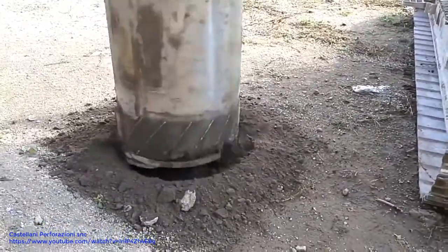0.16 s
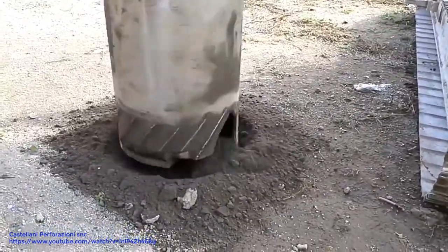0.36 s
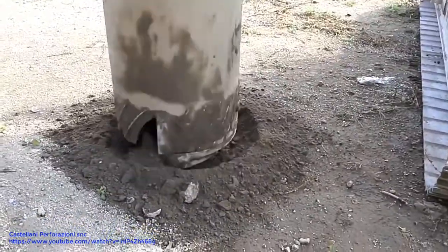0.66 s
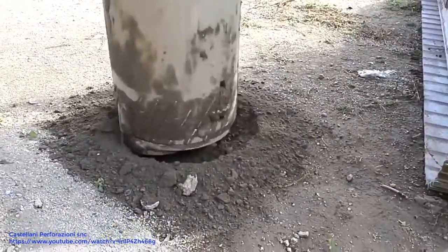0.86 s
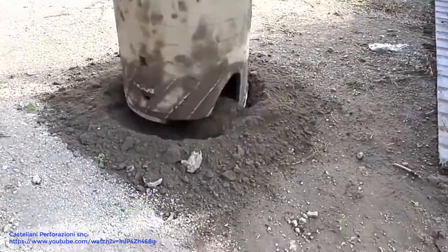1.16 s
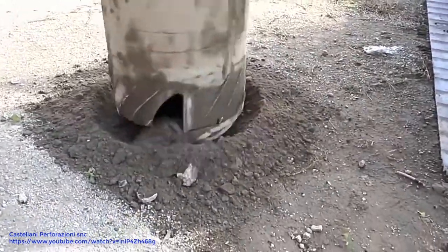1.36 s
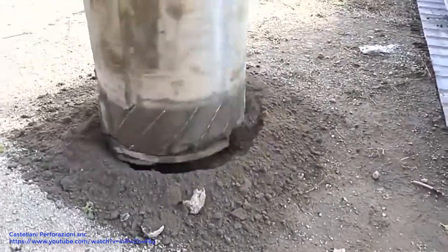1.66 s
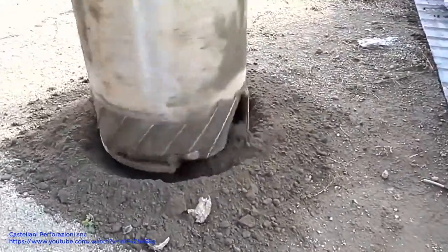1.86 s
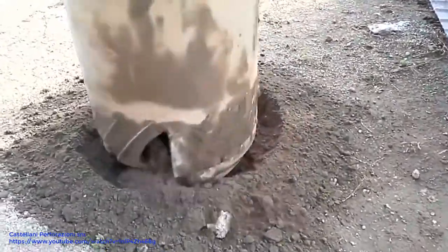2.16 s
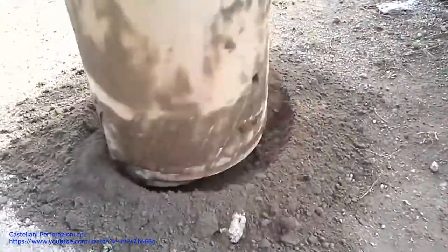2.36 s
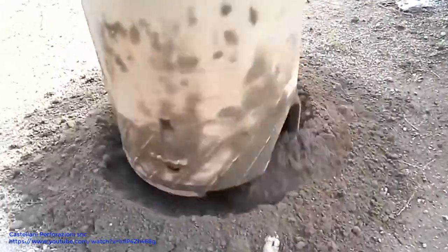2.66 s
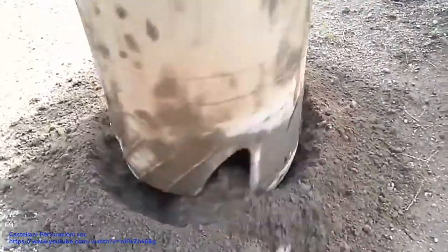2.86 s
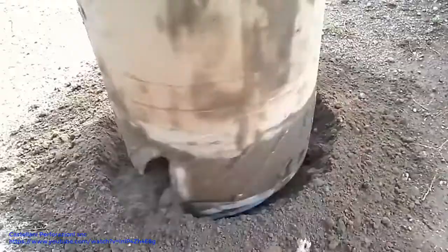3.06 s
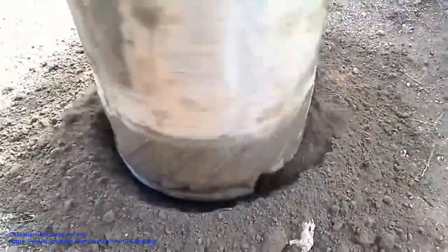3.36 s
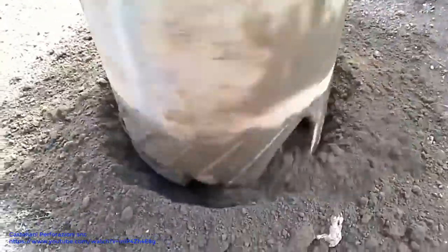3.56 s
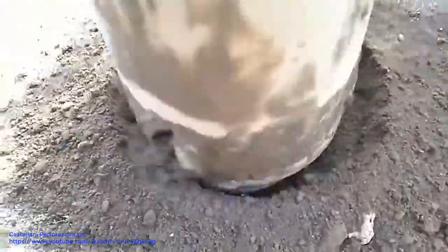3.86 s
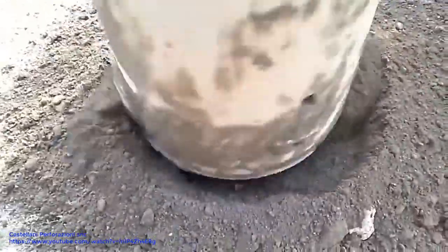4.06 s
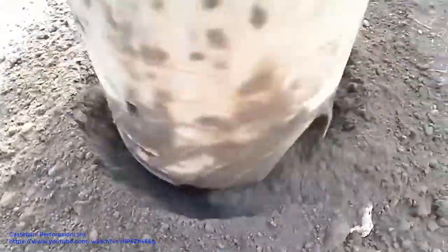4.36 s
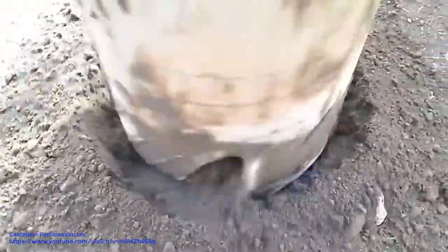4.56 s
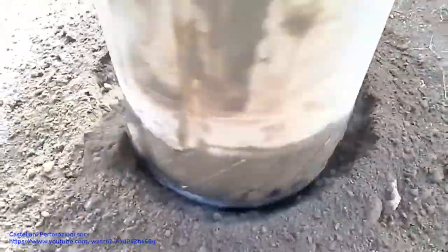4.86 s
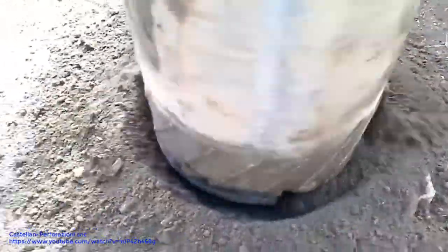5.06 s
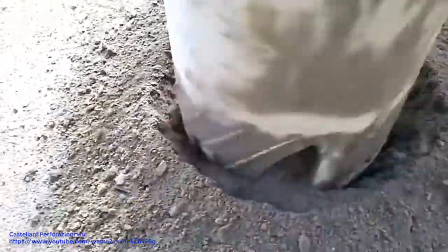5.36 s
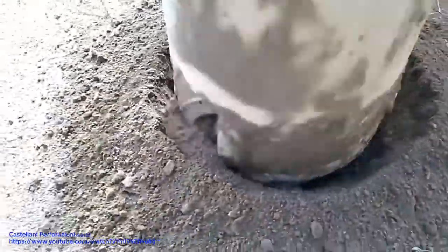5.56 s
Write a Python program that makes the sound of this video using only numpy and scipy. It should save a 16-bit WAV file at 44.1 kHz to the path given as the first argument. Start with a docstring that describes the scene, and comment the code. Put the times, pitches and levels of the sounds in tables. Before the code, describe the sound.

A diesel drilling rig roars steadily while its whining hydraulic drive turns a steel tube into soil, with repeated metal clanks and sharp clicks.

```python
"""Diesel drilling rig, close to the hole

Outdoors, the microphone is carried up to the hole where the rig turns a steel tube into soil.
The engine holds its speed: sines at multiples of one firing rate, with its piston pump. The hydraulic
rotary motor and gears are sines on one pitch that sags and recovers with the load. Over a broad roar of
filtered noise, steel clanks and tube knocks are noise in resonances, dry broadband clicks are single
pulses, and thin high rings are one damped sine at 10.4 kHz, breaking up, at or near some blows."""
import sys
import numpy as np
from scipy import signal
from scipy.io import wavfile
from scipy.ndimage import uniform_filter1d, minimum_filter1d

SR = 44100
rng = np.random.default_rng(int(sys.argv[2]) if len(sys.argv) > 2 else 0)


def wrap_up_sound(samples):
    """Save the sound to the file named by the first command line argument, as 16-bit audio."""
    columns = np.atleast_2d(samples).T
    # keep every value between -1 and 1, then stretch to whole-number steps
    tamed = np.clip(columns, -1, 1)
    steps = np.round(tamed * 32767).astype(np.int16)
    wavfile.write(sys.argv[1], SR, steps)


N = 252363

FIRING_HZ = 102.09
# A second rotor turns this far under the firing rate; time of a beat top; level re the firing line
BEAT_HZ, BEAT_TOP_S, SECOND_ROTOR_DB = 4.95, .15, -5
# Walking up to the hole puts the rig's body between engine and microphone: one smooth level step per line.
# Firing line: level at first/dB, loss/dB, t halfway/s, t spread/s
FIRING_SHADE = (-29.5, 9.5, 2.5, 0.15)
# Upper pump lines: multiple of firing rate, level at first/dB, loss/dB (negative: gain), t halfway/s, t spread/s
PUMP_LINES = [(6.0, -28.5, -1, 4, 0.23), (9.0, -20.5, 13.5, 2.02, 0.22), (24.0, -29, 8.5, 1.35, 0.22)]
# First pump line: t/s, level/dB
PUMP_HUM = [(0, -17), (1.4, -15), (2.2, -18), (2.64, -14), (3.15, -15.5), (3.96, -27.5), (4.4, -21),
            (4.84, -27.5), (5.28, -19), (5.72, -33)]
# Steady weaker engine lines: multiples of the firing rate (thirds are crankshaft orders)
ENGINE_ORDERS = [5 / 3, 2, 4, 13 / 3, 14 / 3, 5, 20 / 3, 7, 12, 14, 18, 21, 33]
# Their levels in the same order: level/dB
ENGINE_ORDERS_DB = [-37, -33, -30.5, -29.5, -27.5, -32, -32.5, -34.5, -34.5, -41, -38.5, -38.5, -44.5]

# Rotary motor: t/s, piston rate f/Hz, level/dB of its multiples 1, 2, 4, 5
ROTARY = [(0, 355.2, -34, -25.5, -40, -37.5), (.22, 359.2, -19, -25, -35, -41),
          (.44, 361, -19.5, -25.5, -27, -33), (.57, 362.2, -21, -37, -39, -45),
          (.83, 359.5, -16.5, -24.5, -22, -31), (1.03, 353.3, -16.5, -27, -39, -25.5),
          (1.3, 363, -24.5, -25, -33.5, -41), (1.45, 351.5, -31, -27, -39, -32),
          (1.6, 354.5, -16, -41, -36, -25.5), (1.8, 364, -14, -21, -38, -34),
          (2.03, 354, -11.5, -27, -22.5, -26.5), (2.24, 357.1, -10.5, -26.5, -29, -34),
          (2.45, 361, -14, -35, -35, -27.5), (2.64, 357.5, -14.5, -32, -26.5, -27.5),
          (2.78, 360.7, -14, -25.5, -41, -38.5), (3.08, 343.8, -11, -21.5, -24, -21),
          (3.32, 358.5, -11, -25, -29.5, -37), (3.6, 355, -12.5, -20.5, -26, -27),
          (3.76, 356.5, -12, -18, -36, -27.5), (3.93, 358, -11.5, -38, -25, -28),
          (4.09, 350.3, -14, -28, -38, -36), (4.3, 354.9, -15, -21, -33, -24.5),
          (4.55, 352.6, -18, -24.5, -26, -24), (4.73, 362.3, -18.5, -23, -26, -19.5),
          (4.94, 357.7, -29, -26, -20.5, -23.5), (5.18, 355.9, -19.5, -20.5, -37, -29.5),
          (5.33, 354.5, -21, -21, -27.5, -18.5), (5.5, 344.7, -16, -23.5, -27, -32),
          (5.72, 344, -12, -29, -29, -26)]
# Weaker motor multiples: multiple, level halfway through/dB, change as the microphone nears the drive/(dB/s)
WHINE = [(3.0, -33, .1), (6.0, -37, -1.5), (8.0, -46, 4.5)]
FADE_DB, FADE_RATE_HZ = 3, 2.5  # these come and go by chance as paths interfere
GEAR_RATIO = 2.085  # tooth mesh rate over piston rate
# Gear whine, growing overall as the tube bites: t/s, level of mesh multiple 2/dB, of mesh multiple 4/dB
GEARS = [(0, -48, -51), (1.7, -38, -51), (2.45, -30, -39.5), (2.86, -32, -49), (3.08, -33, -24),
         (3.35, -25, -45), (3.74, -39, -37.5), (4.18, -24, -27.5), (4.4, -26, -29.5), (4.62, -35, -26.5),
         (4.84, -33, -33), (5.1, -27.5, -30), (5.3, -29, -25), (5.5, -25, -24.5), (5.72, -39, -26)]
# Further mesh lines: multiple, level re multiple 4/dB
MESH_DB = [(1, -3), (3, -6), (5, -9), (6, -12)]

# Roar spectrum, relative density: f/Hz, level per Hz/dB
ROAR_SPECTRUM = [(30, -48.5), (86, -23), (170, -13.5), (300, -1.5), (480, -8), (590, -10), (707, -8),
                 (900, -12), (1460, -15), (1940, -21), (3740, -19), (4700, -28), (5900, -41), (8500, -24.5)]
# Level step of the roar's low, middle, high, top range: loss/dB (negative: gain), t halfway/s, t spread/s
ROAR_SHADE = [(-1.0, 4.4, .4), (2, 1.8, .3), (0.5, 1.7, .3), (6.5, 2.46, 0.27)]
ROAR_SWAY_DB, ROAR_SWAY_RATE_HZ = 1.5, 1.3

# Steel on steel in the drive: t/s, drive level/dB, t60/s, drive level of the bright edge/dB
CLANKS = [(.009, -2, 0.23, -57), (.183, -4, 0.16, -92), (.317, -8, .18, -57), (.439, -8.5, .2, -90),
          (.925, -7, 0.22, -90), (1.526, -3, 0.14, -62), (1.537, -7.5, 0.16, -26), (1.552, -9.5, 0.19, -35),
          (1.969, -14, .15, -36), (2.0, -13, .2, -43), (2.619, -2, .11, -78), (2.896, -14, .22, -87),
          (3.034, -6.5, .2, -53), (3.192, -8, .18, -80), (3.466, -2, .17, -27), (4.032, -8.5, .18, -47),
          (4.14, -14, 0.22, -45), (4.57, -11.5, .2, -85), (4.668, -13, .23, -71), (4.782, -19, .2, -61),
          (4.93, -6, 0.18, -85), (5.37, -7, .2, -36), (5.393, -23, .12, -32), (5.513, 0, 0.19, -34)]
# Broad resonances of the steel: f/Hz, width/Hz, level/dB
STEEL = [(2040, 220, -3.5), (2560, 430, 1.5), (3080, 110, 1), (3220, 280, 0), (3960, 560, 3.5),
         (5000, 1380, -5.5), (6060, 1500, -11.5), (7420, 1800, -21)]
RISE_S_AT_210MS = 0.0057  # rise time constant of a blow with t60 0.21 s; goes with the square of t60
EDGE_T60_S = .07

# Thin high rings at or near some blows: t/s, level before breaking up/dB
PINGS = [(.01, -42), (1.556, -53), (3.49, -46), (4.03, -46), (4.94, -50), (5.41, -55), (5.52, -51)]
PING_HZ, PING_T60_S = 10400, .3

# Dull knocks of the tube wall: t/s, drive level/dB
KNOCKS = [(.08, -8.5), (.623, -5), (1.439, -8.5), (2.99, -15), (3.849, -9.5), (4.169, -6), (5.096, -6.5),
          (5.508, -3)]
# Modes of the tube: f/Hz, level/dB, t60/s
TUBE = [(300.4, -1.5, 0.3), (501, 4.5, 0.11), (606, -1, 0.084), (710, -1, 0.14), (930, -13, 0.04),
        (1118, -2.5, .07), (1330, -12.5, 0.044)]

# Dry broadband clicks: t/s, peak level/dB
TICKS = [(.3275, -26), (.6815, -29), (1.5445, -14), (1.5535, -18), (1.9755, -26), (2.7824, -31),
         (3.0436, -24), (3.1034, -37), (3.2496, -31), (3.4172, -4), (3.9939, -36), (4.3974, -32),
         (4.7926, -28), (5.3693, -27), (5.3937, -9), (5.5143, -21)]

CEILING = 1.0  # limiter, full scale
CUTOFF_HZ = 15800  # stopband edge of the final low-pass


def amp(db):
    """Level in dB to linear gain."""
    return 10 ** (np.asarray(db) / 20)


def in_time(rows):
    """Each level or pitch column of a table as a curve over all samples."""
    s, *columns = np.transpose(rows)
    return [np.interp(np.arange(N) / SR, s, column) for column in columns]


def drift(rate_hz):
    """Slow chance of spread 1: noise at SR / 40 through two equal poles at rate_hz."""
    r = np.exp(-2 * np.pi * rate_hz * 40 / SR)
    noise = rng.standard_normal(N // 40 + 2002)
    slow = signal.lfilter([1], [1, -2 * r, r * r], noise)[2000:]  # settled part
    return np.interp(np.arange(N) / 40, np.arange(len(slow)), slow / slow.std())


def sink(lost_db, halfway_s, spread_s):
    """A smooth step down in dB; a negative loss steps up."""
    t = np.arange(N) / SR
    return -lost_db * (1 + np.tanh((t - halfway_s) / (2 * max(spread_s, .02)))) / 2


def partial(turns, db, waver_db, wobble_rad):
    """A sine of rms level db before its level and phase waver, as over a shaking path."""
    phase = 2 * np.pi * (turns + rng.random()) + wobble_rad * drift(9.7)
    return np.sqrt(2) * amp(db + waver_db * drift(12.3)) * np.sin(phase)


def resonate(x, hz, width_hz):
    """Two-pole resonance with gain 1 on top."""
    r = np.exp(-np.pi * width_hz / SR)
    b = np.array([1, 0, -1]) * (1 - r * r) / 2
    a = [1, -2 * r * np.cos(2 * np.pi * hz / SR), r * r]
    return signal.lfilter(b, a, x + 1e-18)


def ring(drive, hz, t60):
    """Damped mode: a unit click sets a sine of height 1 ringing."""
    r, w = amp(-60 / (t60 * SR)), 2 * np.pi * hz / SR
    return signal.lfilter([0, np.sin(w)], [1, -2 * r * np.cos(w), r * r], drive + 1e-18)


def clicks(rows):
    """One impulse per event."""
    out, rows = np.zeros(N), np.array(rows)
    out[(rows[:, 0] * SR).astype(int)] = amp(rows[:, 1])
    return out


def engine():
    """Firing line beating with a second rotor, pump multiples and weaker orders, all at fixed pitch."""
    t = np.arange(N) / SR
    turns = FIRING_HZ * t
    second_turns = turns - BEAT_HZ * (t - BEAT_TOP_S)
    first_db, *shade = FIRING_SHADE
    rotors = np.cos(2 * np.pi * turns) + amp(SECOND_ROTOR_DB) * np.cos(2 * np.pi * second_turns)
    out = np.sqrt(2) * amp(first_db + sink(*shade)) * rotors
    out += partial(3 * turns, in_time(PUMP_HUM)[0], .6, .2)
    for order, db, *shade in PUMP_LINES:
        out += partial(round(order) * turns, db + sink(*shade) + 2.0 * drift(1.0), 0.34, 0.14)
    for order, db in zip(ENGINE_ORDERS, ENGINE_ORDERS_DB):
        out += partial(order * turns, db, 2.63, 0.48)
    return out


def rotary():
    """Motor multiples and gear mesh share one shaft, so all glide together; the mesh is rougher and flutters."""
    hz, *motor_db = in_time(ROTARY)
    turns = np.cumsum(hz) / SR
    since_middle = (np.arange(N) - N / 2) / SR
    out = np.zeros(N)
    for k, db in zip([1, 2, 4, 5], motor_db):
        out += partial(k * turns, db, 1.5, 0.09 * k)
    for k, db, db_per_s in WHINE:
        line_db = db + db_per_s * since_middle + FADE_DB * drift(FADE_RATE_HZ)
        out += partial(round(k) * turns, line_db, 0.83, 0.11 * round(k))
    second_db, fourth_db = in_time(GEARS)
    mesh = [(2, second_db), (4, fourth_db)] + [(k, fourth_db + db) for k, db in MESH_DB]
    for k, db in mesh:
        out += partial(k * GEAR_RATIO * turns, db + 2 * drift(45), 1, .6 * k)
    return out


def roar():
    """Third-octave noise bands flicker, most at the top; low ones lope, upper ones rattle and pulse with firing."""
    slow_db = [sink(*shade) + ROAR_SWAY_DB * drift(ROAR_SWAY_RATE_HZ) for shade in ROAR_SHADE]
    knots, levels = np.transpose(ROAR_SPECTRUM)
    white = rng.standard_normal((2, N))  # taken in turn, so neighbouring bands differ
    turns = FIRING_HZ * np.arange(N) / SR
    pulse = np.cos(2 * np.pi * turns)
    lope = np.cos(2 * np.pi * turns / 3)  # unequal cylinders repeat once a crank turn
    rattle_db = 0.27 * drift(3.9) + 0.7 * drift(25) + .5 * pulse
    edges = 28 * 2 ** (np.arange(26) / 3)
    out = np.zeros(N)
    for k, (low, high) in enumerate(zip(edges, edges[1:])):
        place = np.log(low * high) / 2  # log of the band's centre
        band_filter = signal.butter(3, [low, high], "band", fs=SR, output="sos")
        band = signal.sosfilt(band_filter, white[k % 2])
        # how far the band belongs to the low, middle, high and top range
        shares = [np.interp(place, np.log([200, 750, 3800, 7800]), row) for row in np.eye(4)]
        db = np.dot(shares, slow_db) + 1.44 * drift(11.7) + 1.8 * shares[3] * drift(30)
        db += (shares[2] + shares[3]) * rattle_db + 1.1 * shares[0] * lope
        out += band * amp(np.interp(place, np.log(knots), levels) + db)
    out = signal.sosfilt(signal.cheby2(5, 45, 9900, fs=SR, output="sos"), out)
    return amp(-15.0) * out / out.std()  # overall rms -15 dB


def clanks():
    """Each blow is an uneven rattle dying in the steel's broad resonances, with a short bright edge."""
    t, body, edge = np.arange(N) / SR, np.zeros(N), np.zeros(N)
    for s, db, t60, edge_db in CLANKS:
        age = np.maximum(t - s, 0)
        rise = 1 - np.exp(-age / (RISE_S_AT_210MS * (t60 / 0.21) ** 2))
        body += rise * amp(db - 60 * age / t60)
        edge += rise * amp(edge_db - 60 * age / EDGE_T60_S)
    # contacts come uneven and in clumps
    contacts = amp(3 * np.minimum(rng.exponential(1, N), 4) + 1.2 * drift(150))
    noise = rng.standard_normal((2, N)) * contacts / np.sqrt(np.mean(contacts ** 2))
    steel = np.zeros(N)
    for k, (hz, width, db) in enumerate(STEEL):
        steel += (-1) ** k * amp(db) * resonate(body * noise[0], hz, width)  # signs alternate
    steel = signal.sosfilt(signal.cheby2(8, 45, 9600, fs=SR, output="sos"), steel)
    edge_filter = signal.butter(3, [8000, 15400], "band", fs=SR, output="sos")
    return steel + signal.sosfilt(edge_filter, edge * noise[1])


def pings():
    """Thin high rings, each a damped sine that breaks up as it dies."""
    breakup = np.clip(1.2 + drift(30), 0, 1.5)
    return ring(clicks(PINGS), PING_HZ, PING_T60_S) * breakup


def knocks():
    """Each knock is a soft push of about 10 ms, new noise every time, into the modes of the tube."""
    swell = signal.lfilter(np.hanning(500) / np.sqrt(500), [1], clicks(KNOCKS))
    push = swell * rng.standard_normal(N)
    tube = sum(amp(db) * ring(push, hz, t60) for hz, db, t60 in TUBE)
    return signal.sosfilt(signal.butter(2, [150, 1800], "band", fs=SR, output="sos"), tube)


def ticks():
    """Dry broadband clicks, one sharp pulse each, high-passed at 40 Hz."""
    return signal.sosfilt(signal.butter(1, 40, "high", fs=SR, output="sos"), clicks(TICKS))


def scene():
    """All sources at one microphone, one channel."""
    return (engine() + rotary() + roar() + clanks() + pings() + knocks() + ticks())[None]


def record(dry):
    """A limiter eases the gain smoothly just ahead of peaks over the ceiling; the top is cut."""
    over_db = np.minimum(0, 20 * np.log10(CEILING / (abs(dry) + 1e-9)))
    held_db = minimum_filter1d(over_db, size=161)
    gain_db = uniform_filter1d(uniform_filter1d(held_db, size=80), size=80)
    return signal.sosfilt(signal.cheby2(12, 70, CUTOFF_HZ, fs=SR, output="sos"), dry * amp(gain_db))


dry = scene()
out = record(dry)
wrap_up_sound(out)
```